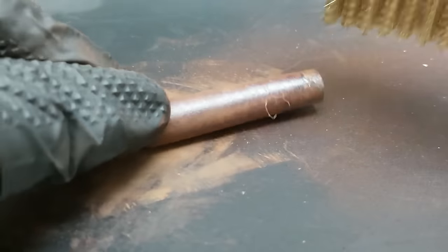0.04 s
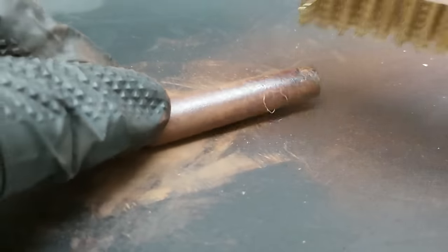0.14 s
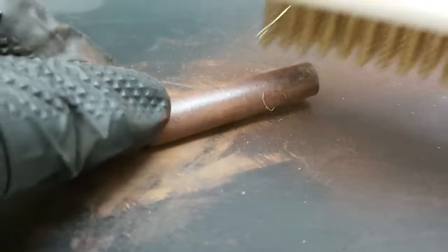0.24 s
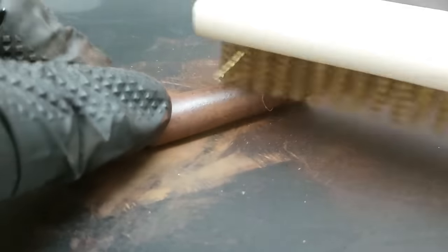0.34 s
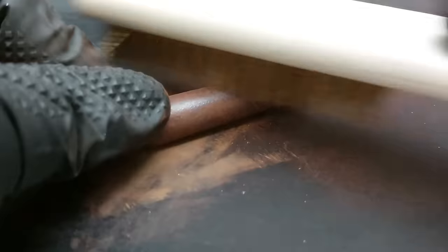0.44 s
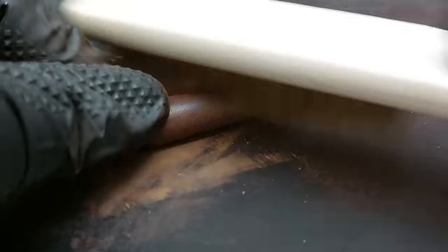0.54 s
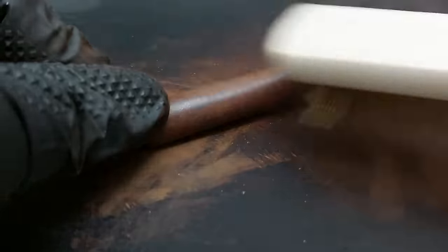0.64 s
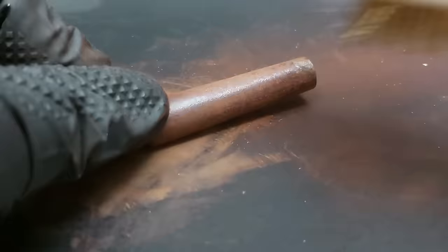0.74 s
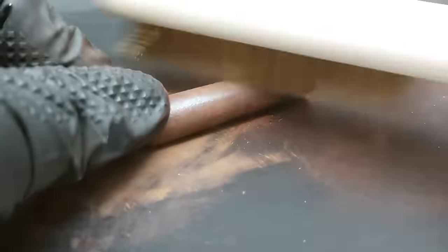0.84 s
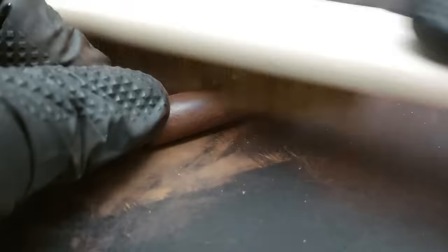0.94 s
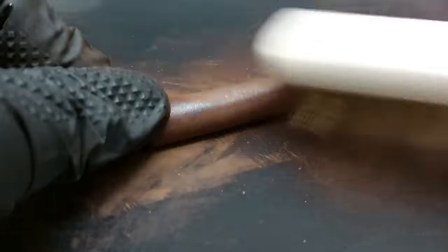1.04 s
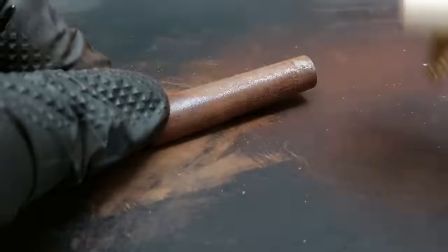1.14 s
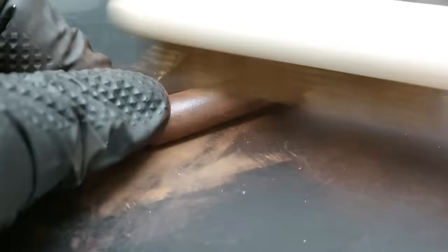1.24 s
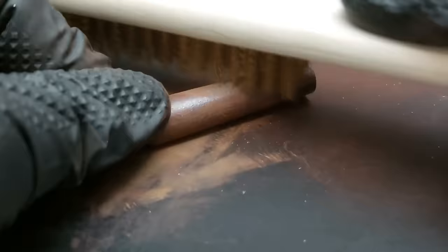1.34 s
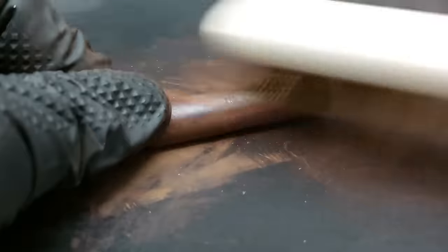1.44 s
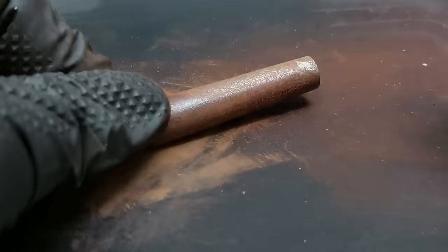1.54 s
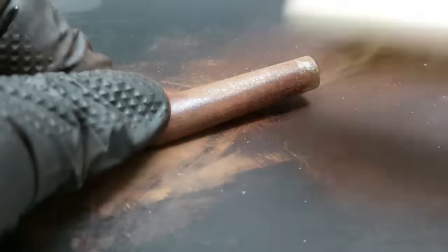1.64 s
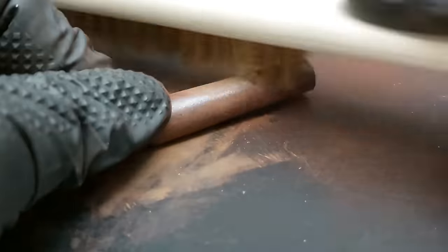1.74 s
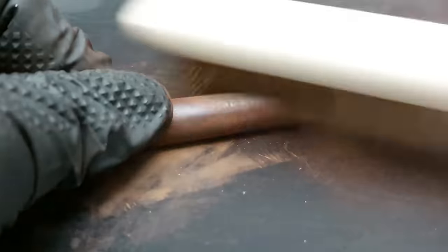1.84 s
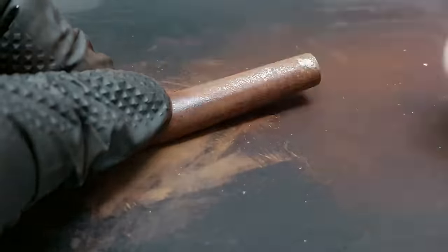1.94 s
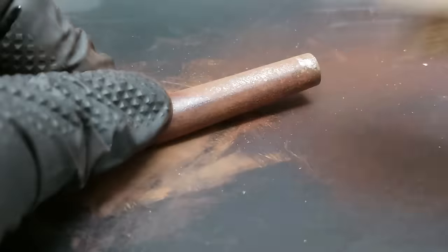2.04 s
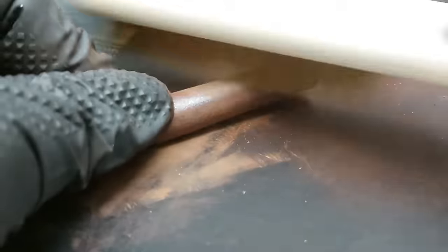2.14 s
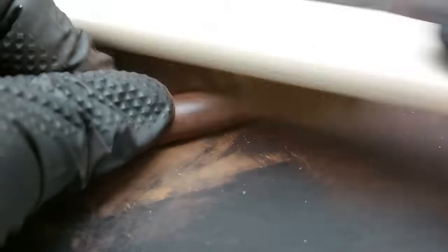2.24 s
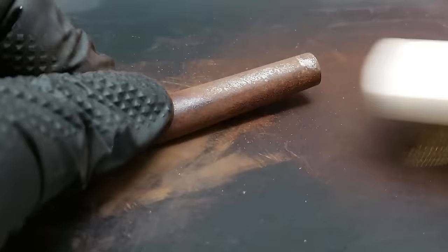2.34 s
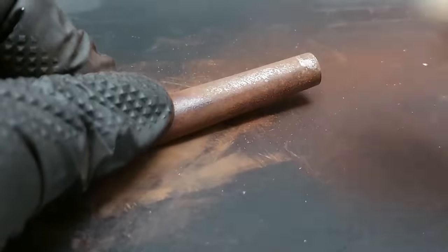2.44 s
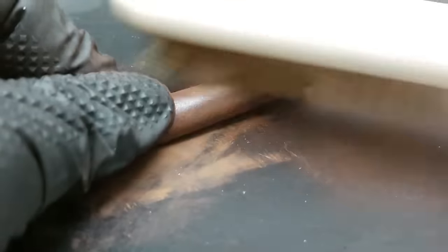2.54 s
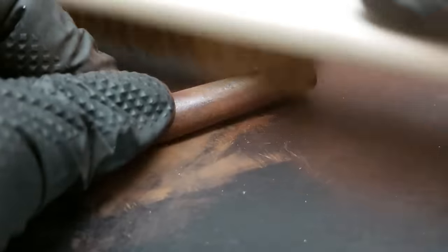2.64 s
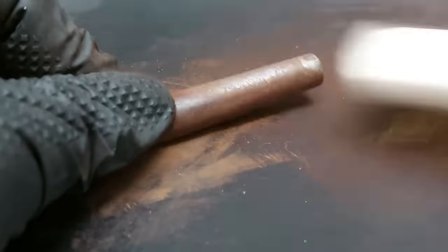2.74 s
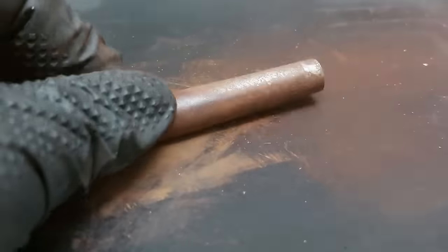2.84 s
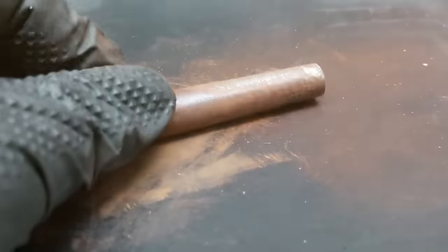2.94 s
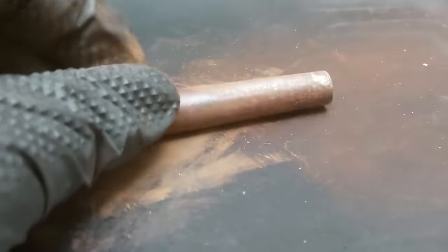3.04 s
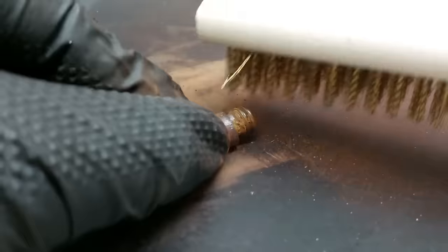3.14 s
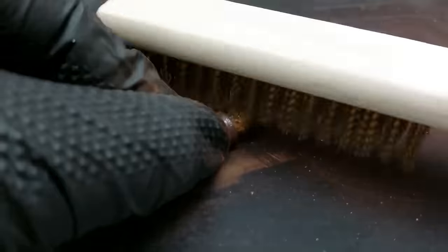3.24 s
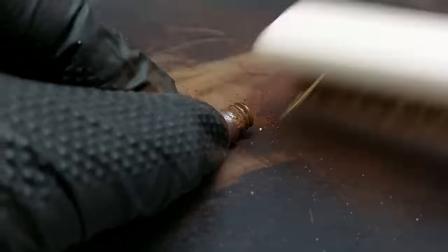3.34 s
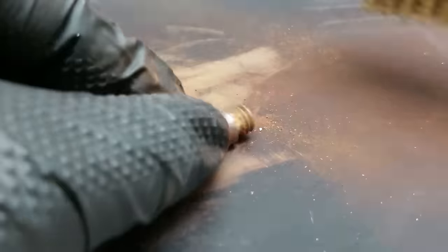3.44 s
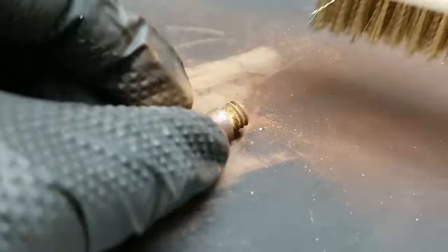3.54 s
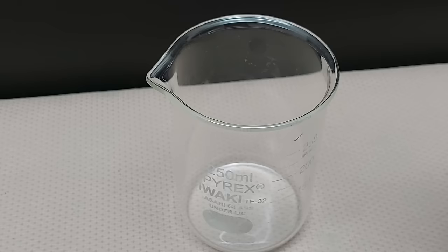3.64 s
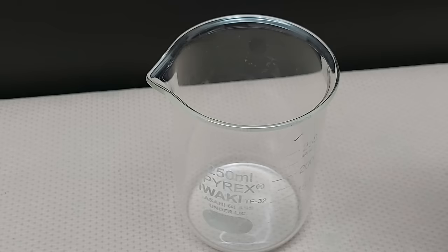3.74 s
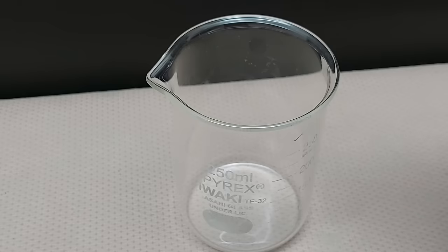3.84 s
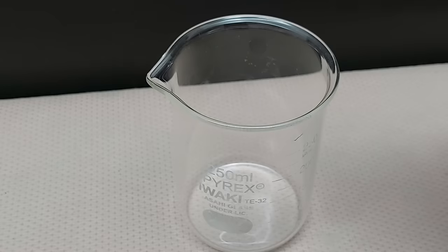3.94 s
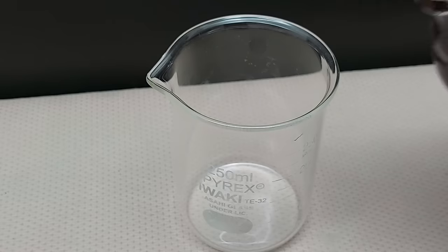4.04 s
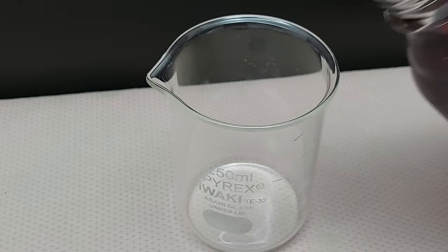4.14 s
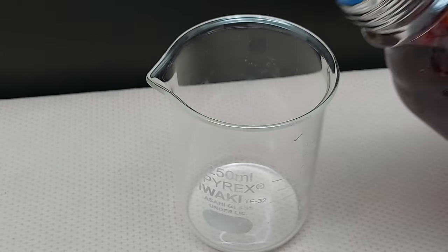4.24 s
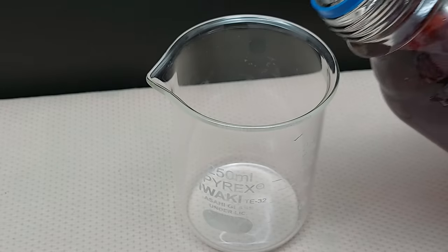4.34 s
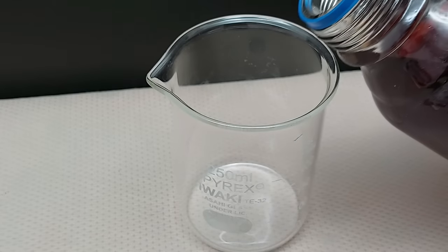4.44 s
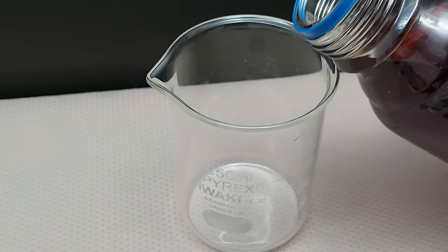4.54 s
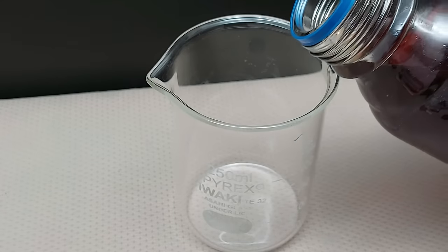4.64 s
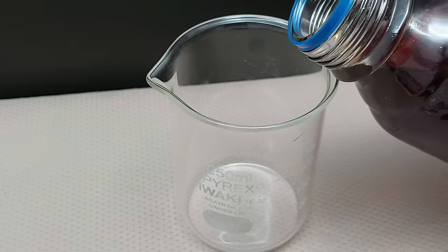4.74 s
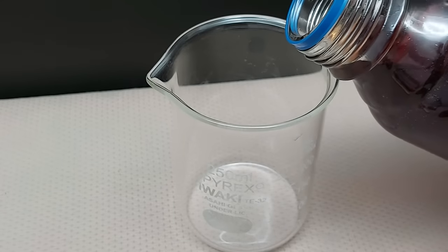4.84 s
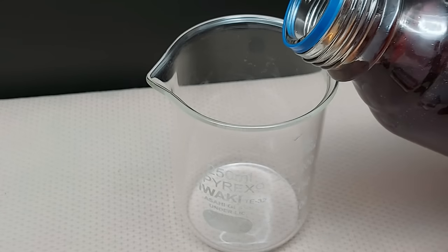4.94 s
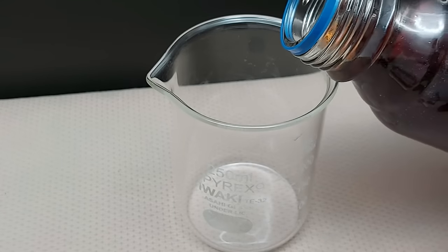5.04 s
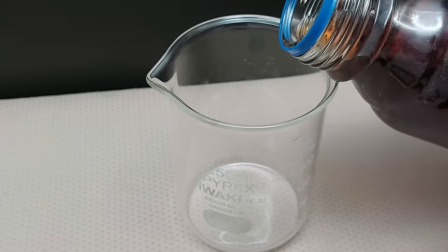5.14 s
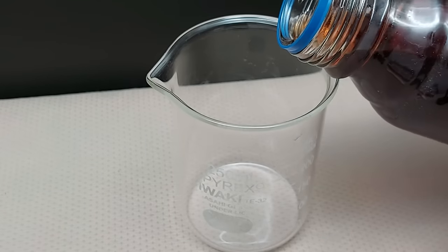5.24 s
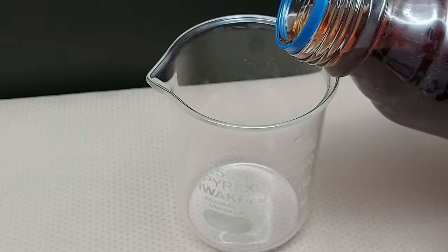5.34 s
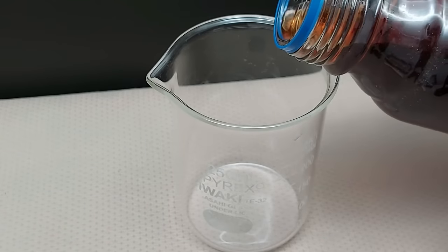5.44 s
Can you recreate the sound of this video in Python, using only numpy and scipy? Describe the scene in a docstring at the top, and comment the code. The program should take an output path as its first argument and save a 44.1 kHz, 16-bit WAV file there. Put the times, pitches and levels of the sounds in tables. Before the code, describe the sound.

A low room hum, slightly stronger on the left, opens the scene and drops at about 0.4 s. From 0.5 s a brass wire brush scrubs a small metal tube held on a table: a dry, dense, bright scratch of many tiny bristle snaps. Strokes repeat roughly every 0.43 s until 3 s, each a longer, softer push followed by a short, louder and sharper pull ending around 0.8, 1.25, 1.7, 2.1, 2.55 and 2.95 s. Dull low thumps and small ticks come from the table, strongest near 1.25, 1.65 and 2.1 s. After a quiet gap, one weaker, shorter stroke sounds from 3.4 to 3.55 s. At 3.7 s the hum abruptly grows again and continues alone. At about 5.17 s a bottle neck bumps and chatters on a glass beaker rim for a tenth of a second, gritty and clinking, leaving a thin ring. Close stereo microphone, small dry room.

```python
"""A room hum opens the scene and soon drops. From 0.5 to 3.6 s a brass wire brush goes to and fro over a small
rusty tube held on a table: random bristle snaps, filtered, make a dense scratch, while jolts and knocks excite
the resonances of the table top. At 3.7 s the hum, filtered noise, grows louder again. At 5.2 s a bottle neck
bumps the rim of a glass beaker, whose decaying modes ring on. A close stereo microphone in a small dry room."""
import sys
import numpy as np
from scipy import signal
from scipy.fft import rfft, irfft
from scipy.io import wavfile
from scipy.ndimage import uniform_filter1d

SR = 44100
rng = np.random.default_rng(int(sys.argv[2]) if len(sys.argv) > 2 else 0)


def to_wav(sig):
    """Store sig (one row per channel, or 1-D mono) as 16-bit WAV at the path in sys.argv[1].

    Samples outside -1..1 are clipped; the rate is SR.
    """
    pcm = np.clip(np.atleast_2d(sig), -1, 1) * 32767
    pcm = np.round(pcm).astype(np.int16)
    wavfile.write(sys.argv[1], SR, pcm.T)  # frames by channels


N = 242550


def undb(db):
    """Decibels to amplitude ratio: 20 dB is a factor of ten."""
    return 10 ** (np.asarray(db, float) / 20)


def level(x, db):
    """Root-mean-square level: scale a sound to the given dB."""
    return x * undb(db) / np.sqrt(np.mean(x ** 2))


def pan(x, db):
    """Interchannel level difference: left minus right in dB, half on each side."""
    return x * undb(np.array([[db], [-db]]) / 2)


def noise(channels=2):
    """White noise: independent Gaussian samples in each channel."""
    return rng.standard_normal((channels, N))


def colour(x, points):
    """Spectral shaping: a zero-phase gain through (Hz, dB) points joined on a log frequency axis."""
    hz, db = np.transpose(points)
    f = np.maximum(np.arange(N // 2 + 1) * SR / N, 1)
    gain = undb(np.interp(np.log(f), np.log(hz), db))
    return irfft(rfft(x) * gain, N)


def body(x, modes):
    """Modal resonance: damped second-order resonators (Hz, width Hz, centre gain dB) in parallel."""
    out = 0
    for hz, width, db in modes:
        r = np.exp(-np.pi * width / SR)
        w = 2 * np.pi * hz / SR
        ring = signal.lfilter([0, r * np.sin(w)], [1, -2 * r * np.cos(w), r * r], x)
        out = out + undb(db) * 2 * (1 - r) * ring
    return out


def blows(start_s, db, contact_s):
    """Elastic contact: each blow is a half-sine force pulse of the given height."""
    x = np.zeros(N)
    x[(np.asarray(start_s) * SR).astype(int)] = undb(db)
    n = int(contact_s * SR) + 2
    half_sine = np.sin(np.pi * np.arange(1, n) / n)
    return np.convolve(x, half_sine)[:N]


def walk(rate_hz):
    """Slow random modulation: random levels held for 1 / rate and smoothed twice; spread near 1."""
    k = int(SR / rate_hz)
    held = np.repeat(rng.standard_normal(N // k + 1), k)
    return 1.3 * uniform_filter1d(uniform_filter1d(held, k), k)[:N]


def room(x, t60_s, wet_db):
    """Diffuse reverberation: direct sound plus exponentially fading noise echoes, unlike left and right."""
    t = np.arange(int(t60_s * SR)) / SR
    echo = rng.standard_normal((2, len(t))) * 1000. ** (-t / t60_s)
    echo = undb(wet_db) * echo / np.sqrt(np.sum(echo ** 2, axis=1, keepdims=True))
    wet = signal.fftconvolve(np.broadcast_to(x, (2, N)), echo, axes=1)[:, :N]
    return (x + wet) / np.sqrt(1 + undb(2 * wet_db))  # total power kept


# Steps of the hum, relative levels: start_s [s], rumble_db, low_murmur_db, high_murmur_db, hiss_db [dB]
HUM_STEPS = [(0, -62.5, -75.5, -90, -83.5), (.383, -70.5, -79, -95, -90.5),
             (3.36, -79.5, -80.5, -91.5, -93), (3.708, -64, -78, -84.5, -85)]
# Rumble below 90 Hz at each step, over the rest: deep_db [dB]
DEEP_DB = [0, -4.5, -4.5, 4]
# Bell-shaped level changes on the steps:
# peak_s, rise_s, fall_s [s], rumble_db, low_murmur_db, high_murmur_db, hiss_db [dB]
HUM_SWELLS = [(0, .1, 0.11, -1.5, 0, 4, 3), (.33, 0.086, 0.096, -4, 8, 16.5, -3),
              (3.2, 0.27, 0.17, -2, -8.5, 0, -2.5), (3.77, 0.054, 0.076, 2, 4, 13, 0.5),
              (5.049, 0.54, 0.1, -1, -4.5, 11, 0.5)]


def hum_levels():
    """Level envelopes: the step in force plus Gaussian swells and dips, added in decibels."""
    t = np.arange(N) / SR
    steps = np.column_stack([HUM_STEPS, DEEP_DB])
    in_force = np.maximum(np.searchsorted(steps[:, 0], t, "right") - 1, 0)
    db = steps[in_force, 1:].T
    for peak_s, rise_s, fall_s, *swell_db in HUM_SWELLS:
        bell = np.exp(-((t - peak_s) / np.where(t < peak_s, rise_s, fall_s)) ** 2)
        db = db + np.outer(swell_db + [0], bell)  # the deep share does not swell
    return uniform_filter1d(db, size=300, axis=1)


# Relative spectra of the hum: frequency_hz [Hz], density_db [dB per Hz]; the murmur has a low and a high band
RUMBLE = [(15, -52), (25, -25), (64, -2), (102, -8), (139, 3.5), (178, -9), (263, -6.5), (299, -19),
          (340, -14), (400, -24.5), (520, -48), (880, -120)]
MURMUR = [
    [(240, -29.5), (320, 9), (550, 3), (720, -28.5)],
    [(480, -7), (650, 0), (860, -3.5), (960, -13.5), (1300, -43.5)],
]
HISS = [(590, -34.5), (1000, -3.5), (1160, -2.5), (3750, -14), (5970, -17.5), (9170, -13), (15100, -21),
        (16000, -26.5)]
RUMBLE_PAN_DB, RUMBLE_ALIKE = 9, 0.75  # left minus right; correlation of left and right


def hum():
    """Filtered noise: partly correlated rumble, stronger on the left, two murmur bands and smooth hiss."""
    rumble_db, *murmur_db, hiss_db, deep_db = hum_levels()
    mid, side = noise()
    opposite = np.array([[1], [-1]])
    rumble = np.sqrt(1 + RUMBLE_ALIKE) * mid + np.sqrt(1 - RUMBLE_ALIKE) * side * opposite
    rumble = level(colour(rumble, RUMBLE), 0.98)
    deep = colour(rumble, [(80, 0), (105, -40)])
    rumble = rumble + deep * (undb(deep_db) - 1)
    out = pan(rumble, RUMBLE_PAN_DB) * undb(rumble_db + 0.33 * walk(0.67))
    for band, db in zip(MURMUR, murmur_db):
        murmur = level(colour(noise(), band), 3.8)
        out = out + pan(murmur, 3.2) * undb(db + 0.64 * walk(4.7))
    hiss = level(colour(noise(), HISS), 2.5)
    return out + pan(hiss, 1.2) * undb(hiss_db)


# Bottle neck chattering on the rim: start_s [s], force_db [dB, relative]
BUMPS = [(5.1695, 0), (5.178, 6.5), (5.196, 0.5), (5.209, -7.5), (5.221, -8.5), (5.244, -28),
         (5.255, -18.5), (5.276, -19)]
BUMP_RISE_S, BUMP_FALL_S = 0.0046, 0.0087  # time constants


def neck_force():
    """Impact force: each bump of the bottle neck on the rim bites fast and lets go slowly."""
    start_s, db = np.transpose(BUMPS)
    since = np.maximum(np.arange(N) / SR - start_s[:, None], 0)
    bite = 1 - np.exp(-since / BUMP_RISE_S)
    release = np.exp(-since / BUMP_FALL_S)
    return undb(db) @ (bite * release)


# Shape common to every push, which lands, runs, sinks, then its scratch swells again just before the pull:
# share [0-1 of the stroke], scratch_db, rumble_db, low_db, bright_db [dB]
PUSH = [(0, -8.5, 3, -19, -5.5), (0.221, 0, -3.5, -6, 3), (.5, -3, 0, 1.5, -2.5),
        (0.799, -6.5, -5.5, -11.5, -4), (.93, -14.5, -12, -12, -14), (1, 7, -11, -13, 4.5)]
# Shape common to every pull, which gathers speed, thins and brightens, then slides off the end: same columns
PULL = [(0, -11, -5.5, -3, -12.5), (.1, -2, 0, -1.5, -6.5), (.45, 0.5, -3.5, -4, -0.5),
        (.7, 0, 0, -19, 1.5), (.84, 0, -2.5, -8, -5.5), (1, -31.5, -1, -18, -31)]
# Each push, lasting until its pull begins, relative levels:
# start_s [s], scratch_db, rumble_db, low_db, bright_db [dB], fade_in_s [s]
PUSHES = [(0.499, -50, -49, -50, -50, 0.074), (0.987, -50.5, -47.5, -50.5, -51, 0.00071),
          (1.403, -51, -43, -49.5, -51.5, 0.0015), (1.839, -51.5, -45.5, -51, -51.5, 0.0011),
          (2.272, -50.5, -43.5, -51, -52, 0.0011), (2.687, -51.5, -46.5, -49.5, -52.5, 0.008),
          (3.395, -55, -51, -62, -58.5, 0.014)]
# Each pull, relative levels: start_s, end_s [s], scratch_db, rumble_db, low_db, bright_db [dB],
# rumble_change_db [dB along the stroke], end_shake_db [dB, on rumble and low scratch]
PULLS = [(0.698, 0.832, -48.5, -38.5, -48, -42.5, -11.5, -11),
         (1.118, 1.261, -48, -39.5, -46.5, -41, -5.5, 16), (1.548, 1.683, -47, -36, -48.5, -41, 0, 11.5),
         (1.98, 2.116, -47, -38, -49.5, -43, 3, 16.5), (2.411, 2.544, -47.5, -39, -53, -43, 2, 2),
         (2.819, 2.959, -47.5, -37.5, -53.5, -43, -4, 9.5), (3.492, 3.557, -52, -45, -51.5, -49, -16.5, 5)]
# How far down each layer of a push starts: scratch, rumble, low, bright [dB]
FADE_IN_DB = [-21, -13, -14.5, -20]
SHAKE_FROM, SHAKE_FULL = 0.71, 0.94  # shares of the pull
SCRATCH_LAYER, RUMBLE_LAYER, LOW_LAYER, BRIGHT_LAYER = range(4)


def stroke_gain(layer):
    """Amplitude envelope: gain of one layer over all strokes, silent while the bristles are off the tube."""
    t, gain = np.arange(N) / SR, np.zeros(N)
    push_share, *push_db = np.transpose(PUSH)
    pull_share, *pull_db = np.transpose(PULL)
    for (land, *out_db, fade_s), (turn, end, *back_db, change_db, shake_db) in zip(PUSHES, PULLS):
        share = (t - land - fade_s) / (turn - land - fade_s)
        db = out_db[layer] + np.interp(share, push_share, push_db[layer])
        db += FADE_IN_DB[layer] * np.clip(1 - (t - land) / fade_s, 0, 1)
        gain += undb(db) * (t >= land) * (t < turn)

        share = np.clip((t - turn) / (end - turn), 0, 1)
        db = back_db[layer] + np.interp(share, pull_share, pull_db[layer])
        if layer == RUMBLE_LAYER:
            db += change_db * share
        if layer in (RUMBLE_LAYER, LOW_LAYER):
            db += np.interp(share, [SHAKE_FROM, SHAKE_FULL], [0, shake_db])
        gain += undb(db) * (t >= turn) * (t < end)
    return uniform_filter1d(gain, size=60)


# Brush back or tube knocking the table: start_s [s], force_db [dB, relative],
# tick_db [dB, tick relative to the thump force]
KNOCKS = [(0.503, -51, -8), (0.514, -50.5, -40), (0.722, -60.5, -19), (0.986, -31.5, -14),
          (1.244, -15.5, -38), (1.408, -35, -22), (1.653, -18.5, -24), (1.841, -31, -19),
          (1.982, -30.5, -21), (2.085, -17, -15), (2.276, -40, -26.5), (2.41, -28, -20),
          (2.525, -27.5, -13), (2.689, -44.5, -4.5), (2.823, -28.5, -10), (2.94, -32, -9.5),
          (3.398, -39.5, -18.5), (3.493, -30.5, -8)]
# Resonances of the table top: frequency_hz [Hz], width_hz [Hz], gain_db [dB]
TABLE = [(65.5, 22, -15.5), (138, 51, 0), (154, 38, -5.5), (219.3, 36.4, -3.5), (266.7, 31, -11),
         (428, 42, -10), (635, 110, -36.5)]
# Balance of each resonance: left_minus_right_db [dB]
TABLE_PAN_DB = [4, 0.5, -0.5, 4.5, -12, 0, -6.5]
# Radiation of the top, which sends out little deep bass: frequency_hz [Hz], gain_db [dB]
TABLE_REACH = [(20, -32.5), (45, -21.5), (64, -4), (85, -9.5), (125, 3), (300, 6), (345, -2), (500, -4.5),
               (2000, 0)]
THUMP_LAG_S = 0.004  # the table answers just after the tick
BUMP_THUMP_DB = -51  # share of the neck force that shakes the table
ROOM_LOW_T60_S, ROOM_LOW_DB = 0.17, -8


def table_top():
    """Forced vibration of a plate: tuft jolts through the tube, knocks and the beaker excite its modes."""
    jolts = (rng.random(N) < 900 / SR) * rng.standard_normal(N)
    jolts = jolts / np.std(body(jolts, TABLE))
    start_s, knock_db, tick_db = np.transpose(KNOCKS)
    # the rumble of the strokes is held below this level, so that the knocks stand out
    rows = np.minimum(stroke_gain(RUMBLE_LAYER), undb(-35.5))
    force = jolts * (rows + undb(BUMP_THUMP_DB) * neck_force())
    force = force - undb(5.0) * blows(start_s + THUMP_LAG_S, knock_db, contact_s=0.0015)
    # the heavy bottle leans on the beaker: one slow push
    force = force + blows([BUMPS[0][0]], -41, contact_s=0.008)
    top = sum(pan(body(force, [mode]), pan_db) for mode, pan_db in zip(TABLE, TABLE_PAN_DB))

    # bristles slap the tube together for a few ms
    slap = level(colour(noise(), [(1000, -28.0), (4000, 1), (8500, 1.0), (16000, -5)]), -3.0)
    tick = blows(start_s, knock_db + tick_db, contact_s=0.0025) * slap
    return room(colour(top, TABLE_REACH) + tick, ROOM_LOW_T60_S, ROOM_LOW_DB)


# Modes of beaker and bottle: frequency_hz [Hz]
GLASS_HZ = [641, 722, 779, 853, 1333, 1363, 1483, 2094, 2767, 3537, 3544, 3648, 4140, 6272, 6425, 8175,
            8350, 11840]
# For each mode: level_db [dB, relative], t60_s [s], left_minus_right_db [dB]
GLASS = [(-2.5, 0.047, 0), (-7, 0.15, -12.5), (-2.5, 0.13, 3), (-3.5, 0.024, -13), (5, 0.025, 1),
         (-3.5, 0.73, -1), (-14, 0.059, -15), (-14, 0.034, 10), (-29, 0.023, 2.5), (2.5, 0.026, -12.5),
         (-39, 0.35, 1), (-20.5, 0.22, 0), (-15, 0.017, -0.5), (-20, 0.034, 5.5), (-8.5, 0.0095, -6.5),
         (-12.5, 0.016, 1), (-24, 0.029, -3), (-35, .05, 0)]
# Relative spectrum of the gritty contact noise: frequency_hz [Hz], density_db [dB per Hz]
GRIT = [(200, 5), (500, -2.5), (900, -5), (2000, -3), (3000, -9), (4500, -17.5), (5200, -34), (6300, -16),
        (7200, -31), (8300, -15), (10500, -36), (12000, -19.5), (16000, -35.5)]
GLASS_DB, GRIT_DB = -36, -40.5
ROOM_T60_S = 0.11  # for glass and scratch


def beaker():
    """Modal ringing: jarring contact feeds modes unevenly; those held by the neck die, free ones ring on."""
    force, first = neck_force(), int(BUMPS[0][0] * SR)
    t = np.arange(first, N) / SR
    out = force * level(colour(noise(), GRIT), GRIT_DB)
    for hz, (mode_db, t60_s, pan_db) in zip(GLASS_HZ, GLASS):
        # the contact wavers in strength and in phase
        grip = force * undb(2.5 * walk(200)) * np.exp(.6j * walk(150))
        fade = 1000. ** (-1 / (t60_s * SR))
        swing = signal.lfilter([np.sqrt(1 - fade) / 20], [1, -fade], grip[first:])
        # each mode reaches the right side up to a quarter turn late
        late = rng.random() * np.array([[0.], [.25]])
        ring = (swing * np.exp(2j * np.pi * (hz * t - late))).imag
        out[:, first:] += pan(undb(GLASS_DB + mode_db) * ring, pan_db)
    return room(out, ROOM_T60_S, wet_db=-11)


def snaps(per_s, spread_db):
    """Stick-slip release: tips let go at random, some harder; left and right hear different tips."""
    hit = rng.random((2, N)) < per_s / SR
    hardness = np.minimum(rng.exponential(size=(2, N)), 4)
    return hit * noise() * undb(spread_db * hardness)


# Relative spectrum of the scratch: frequency_hz [Hz], density_db [dB per Hz]
SCRATCH = [(710, -17), (1200, -8.5), (1340, -14.5), (1670, -10), (1940, -4), (2630, -7), (3780, -1),
           (5630, -5), (7360, -4.5), (8460, 1), (9320, -3), (13600, 2.5), (15600, 0.5)]
# Faint resonances of the tube: frequency_hz [Hz], width_hz [Hz], gain_db [dB over the snaps]
TUBE = [(1980, 250, -14.5), (4150, 240, -12), (8480, 280, -13)]
SNAPS_PER_S, SNAP_SPREAD_DB = 12000, 2.26
SCRATCH_PAN_DB, BRIGHT_PAN_DB = -1.5, -1.5  # left minus right
ROOM_DB = -6


def brush():
    """Frictional excitation: snaps ring the tube faintly and rust patches make the scratch flutter."""
    tips = snaps(SNAPS_PER_S, SNAP_SPREAD_DB) * undb(1.1 * walk(90))
    tips = colour(tips + body(tips, TUBE), SCRATCH)
    treble = colour(tips, [(8500, -40), (9500, 0)])
    scratch = pan(level(tips - treble, 3.33), SCRATCH_PAN_DB)
    bright = pan(level(treble, 4.27), BRIGHT_PAN_DB)
    low = colour(snaps(4000, 4.5), [(300, -32.5), (420, -0.5), (800, -9.0), (1300, -16.5), (1800, -23.5)])
    out = scratch * stroke_gain(SCRATCH_LAYER)
    out = out + bright * stroke_gain(BRIGHT_LAYER)
    out = out + level(low, 1.2) * stroke_gain(LOW_LAYER)
    return room(out, ROOM_T60_S, ROOM_DB)


def scene():
    """Linear superposition: the sounds of all sources add."""
    return hum() + table_top() + beaker() + brush()


TOP_HZ = 15850


def record(dry):
    """Band limiting: the recorder cuts the top with a steep elliptic low-pass."""
    low_pass = signal.ellip(10, .2, 70, TOP_HZ, fs=SR, output="sos")
    return signal.sosfilt(low_pass, dry)


dry = scene()
out = record(dry)
to_wav(out)
```